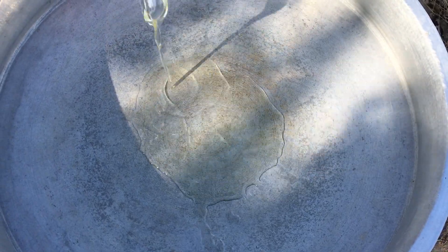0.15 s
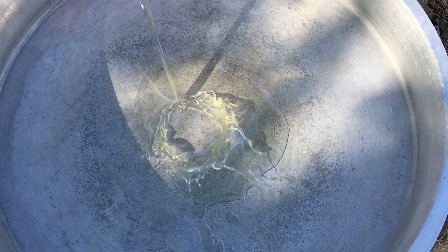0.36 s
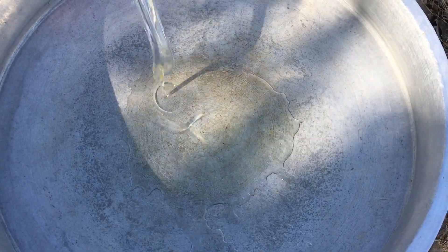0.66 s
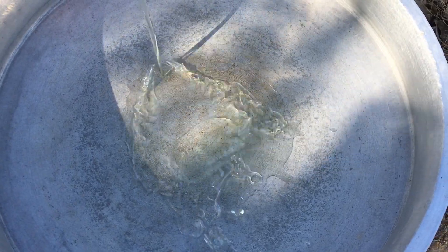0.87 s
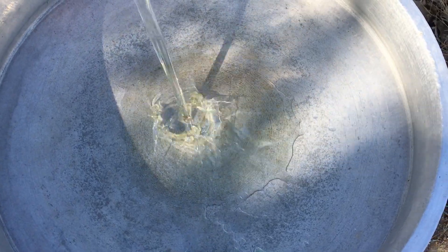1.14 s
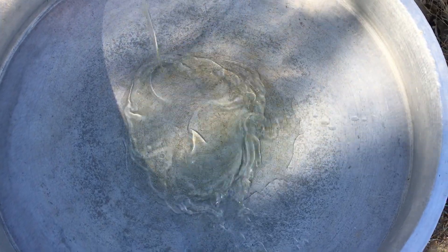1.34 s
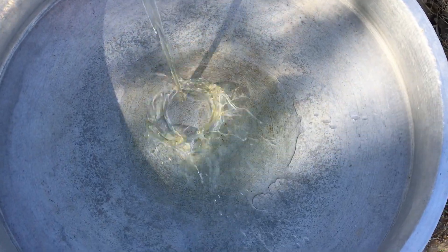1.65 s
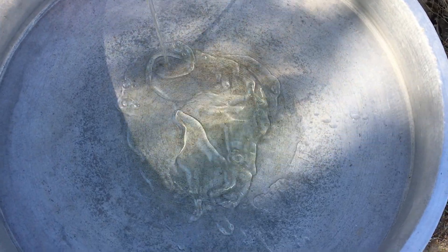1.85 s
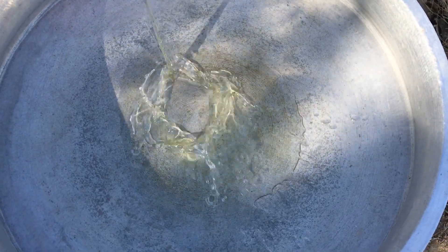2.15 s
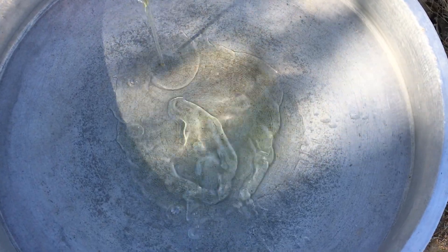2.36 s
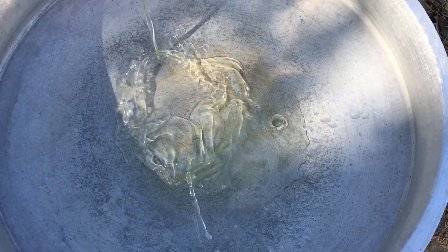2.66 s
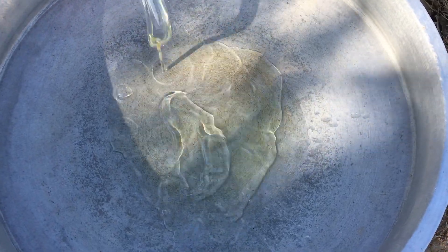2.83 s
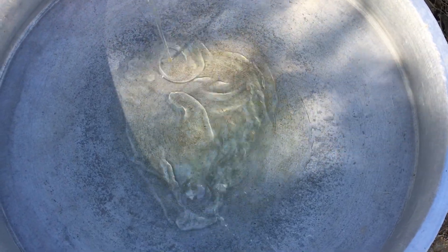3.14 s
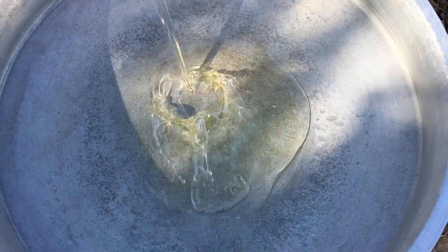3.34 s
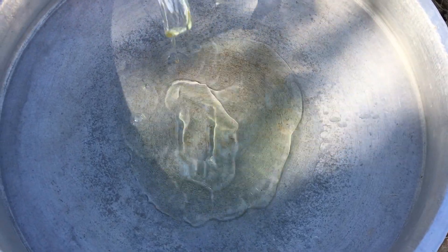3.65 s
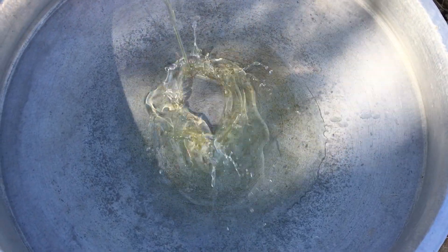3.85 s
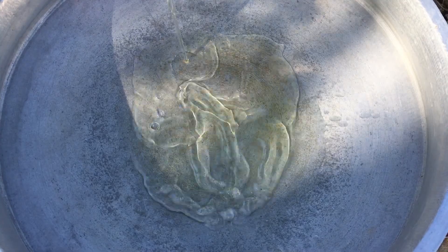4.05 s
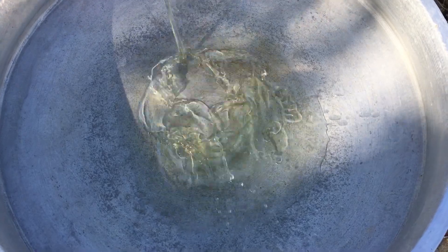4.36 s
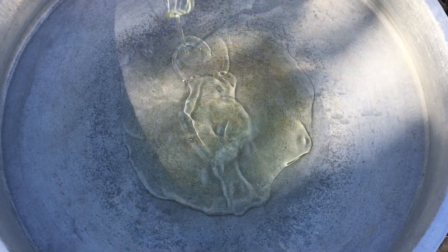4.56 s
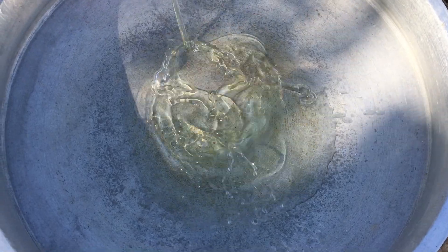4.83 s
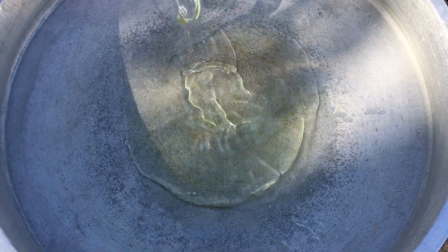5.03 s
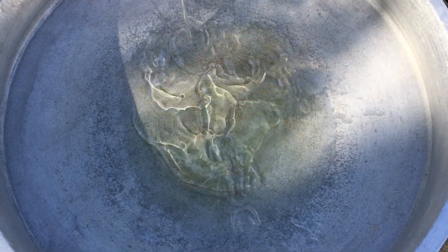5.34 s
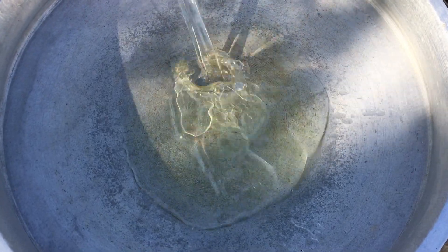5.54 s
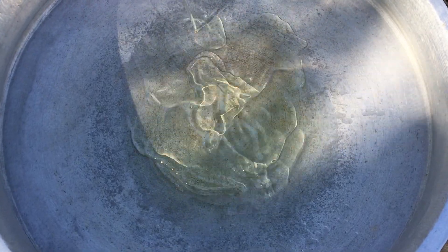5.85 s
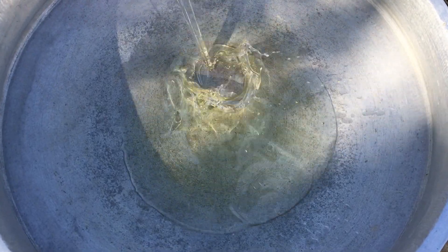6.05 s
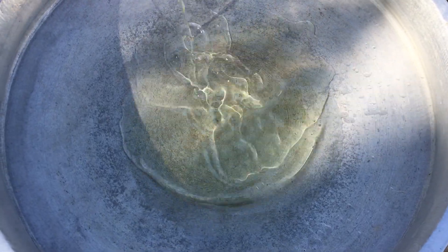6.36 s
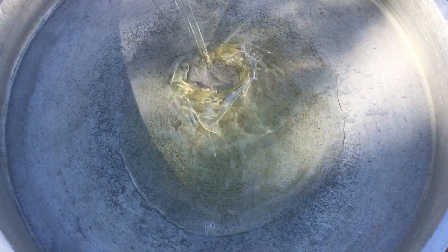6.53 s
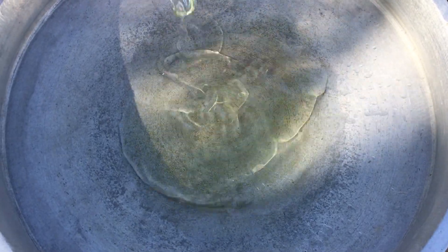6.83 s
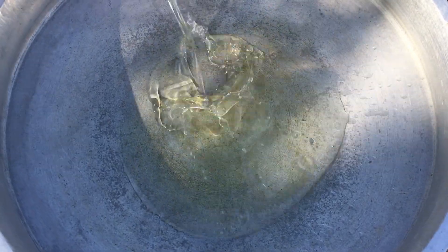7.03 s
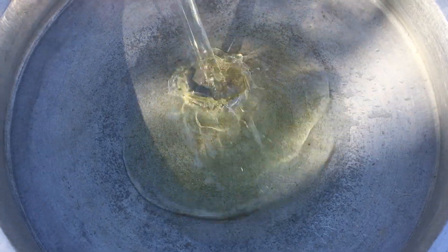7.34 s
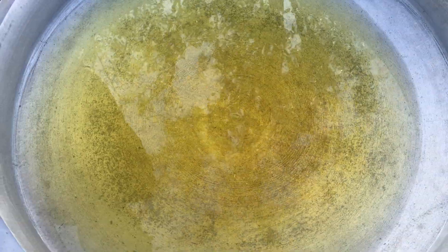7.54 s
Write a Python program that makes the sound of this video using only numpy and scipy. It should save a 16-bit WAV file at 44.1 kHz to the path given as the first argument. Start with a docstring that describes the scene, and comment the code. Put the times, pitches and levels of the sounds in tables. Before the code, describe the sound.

Outdoors, oil pours from a bottle into a wide metal pan, about two pulses a second. Each soft slap brings a rising plop, small bubble blips and a faint, short metallic ring; dull gulps from the bottle fall in between. Droplets tick sharply, most strongly just after six seconds. Low wind thumps the close microphone throughout, over faint hiss. Near the end everything cuts to silence briefly.

```python
"""Outdoors, cooking oil glugs out of a bottle in pulses and lands in a wide metal pan.
Trapped air bubbles are decaying sines, many gliding upward, that set the pan's resonances ringing.
Slugs slap down as noise bursts with rising plops, droplets tick and fizz, and the bottle gulps air.
Low noise makes the wind buffeting the microphone, over a faint hiss. Near the end the sound cuts out briefly."""
import sys
import numpy as np
from scipy import signal
from scipy.fft import rfft, irfft, next_fast_len
from scipy.io import wavfile
from scipy.ndimage import uniform_filter1d

SR = 44100
rng = np.random.default_rng(int(sys.argv[2]) if len(sys.argv) > 2 else 0)


def file_out(sig):
    """Save sig as 16-bit WAV at sys.argv[1]."""
    # one column per channel
    cols = np.atleast_2d(sig).T
    # limit, then scale
    lim = np.clip(cols, -1, 1)
    pcm = np.round(lim * 32767).astype(np.int16)
    wavfile.write(sys.argv[1], SR, pcm)


N = 339215  # length of the scene in samples


def undb(db):
    """Turn decibels into an amplitude factor."""
    return 10 ** (np.asarray(db) / 20)


def level(x, db):
    """Scale x so that its RMS (average strength) is db."""
    return x * undb(db) / np.sqrt(np.mean(x ** 2))


def band(x, lo_hz, hi_hz, order=2):
    """Keep only the pitches between two limits."""
    limits = [lo_hz, min(hi_hz, .45 * SR)]
    return signal.sosfilt(signal.butter(order, limits, "bandpass", fs=SR, output="sos"), x)


def add(out, s, x):
    """Mix x into out from time s on."""
    i = int(s * SR)
    out[i:i + len(x)] += x[:len(out) - i]


def wander(length, rate):
    """Random values, rate of them per second, joined by smooth slopes."""
    hold = int(SR / rate)
    steps = np.repeat(rng.standard_normal(length // hold + 1), hold)
    return uniform_filter1d(steps, hold)[:length]


def walk(rate):
    """A random wander as long as the scene."""
    return wander(N, rate)


def chirp(db, hz, t60, octaves, attack_s=0.00022, bend=1.01, burst=2.26, life=np.inf):
    """A sine that fades 60 dB in t60 while its pitch glides by the given octaves; bend delays the glide."""
    t = np.arange(int(max(t60, .005) * SR)) / SR
    pitch = np.minimum(hz * 2 ** (octaves * (t / t60) ** bend), .4 * SR)
    cycles = np.cumsum(pitch) / SR
    # a bubble bursts once its pitch has climbed by the factor burst or its life in cycles is used up
    bursting = (pitch / (burst * hz)) ** 6 + (cycles / life) ** 8
    alive = (1 - np.exp(-t / attack_s)) / (1 + bursting)
    return undb(db - 60 * t / t60) * alive * np.sin(2 * np.pi * cycles)


def rough(x, depth_db=3, rate=500):
    """The torn oil surface makes a tone flutter in level."""
    return x * undb(depth_db * wander(len(x), rate))


def splash(db, hz, t60, wide, attack_s=0.00084):
    """A decaying noise burst from hz / wide to hz * wide."""
    t = np.arange(int(max(t60, .005) * SR)) / SR
    noise = level(band(rng.standard_normal(len(t)), hz / wide, hz * wide), db)
    return noise * undb(-60 * t / t60) * (1 - np.exp(-t / attack_s))


def eddies(lo_hz, hi_hz, db):
    """Swirling air as band noise, its loudness evened out over a few cycles."""
    x = band(rng.standard_normal(N), lo_hz, hi_hz)
    power = uniform_filter1d(x ** 2, int(1.6 * SR / lo_hz))
    return level(x / np.sqrt(power + 1e-12), db)


# Colour of the outdoor hiss: f/Hz, relative level/dB (per Hz)
HISS_COLOUR = [(24, -50), (40, 11.5), (112, -11), (400, -13), (2380, -13.5), (4930, -17.5), (9450, -25.5),
               (14500, -40.5), (16000, -51.5)]
HISS_DB = -53  # RMS before the swelling


def air():
    """Distant outdoor hiss: noise coloured pitch by pitch, swelling a little."""
    hz, db = np.transpose(HISS_COLOUR)
    size = next_fast_len(N)
    bins_hz = np.maximum(np.arange(size // 2 + 1) * SR / size, 1)
    colour = undb(np.interp(np.log(bins_hz), np.log(hz), db))
    hiss = irfft(rfft(rng.standard_normal(size)) * colour, size)[:N]
    return level(hiss, HISS_DB) * undb(0.367 * walk(3.5))


# Slow strength of the wind on the microphone, before its flutter: t/s, level/dB
GUSTS = [(0, -36.5), (.7, -36.5), (.96, -56.5), (1.15, -35), (1.4, -54), (1.7, -42.5), (2.45, -36.5),
         (2.62, -48.5), (2.95, -54.5), (3.15, -35.5), (3.55, -47.5), (3.75, -37.5), (4.08, -48.5),
         (4.3, -34), (4.58, -47.5), (4.72, -29.5), (5.8, -47.5), (6.6, -36.5), (6.85, -45.5), (7.2, -27),
         (7.5, -38), (7.69, -57)]
# Single buffets that stand out of the wind: start t/s, time until the fade t/s, level/dB
BUFFETS = [(.004, 0.0473, -23.5), (0.092, 0.045, -26), (0.201, 0.034, -24.5), (0.344, 0.07, -32.5),
           (0.417, 0.087, -27), (1.078, 0.017, -30.5), (1.845, 0.043, -31.5), (2.279, 0.013, -28),
           (2.393, 0.019, -30), (3.24, 0.055, -35), (4.335, 0.027, -30), (4.685, 0.057, -27.5),
           (4.773, 0.18, -27.5), (5.054, 0.019, -25), (5.143, 0.065, -28.5), (5.249, 0.018, -26),
           (5.306, 0.063, -27.5), (5.467, 0.071, -28), (5.594, 0.097, -33), (5.692, 0.0586, -30),
           (5.796, 0.056, -31), (6.579, 0.046, -30), (6.641, 0.029, -30.5), (6.708, 0.055, -33),
           (7.103, 0.073, -30), (7.142, 0.015, -19), (7.186, 0.025, -25.5), (7.284, 0.11, -28),
           (7.423, 0.029, -31)]
BUFFET_ATTACK_S, BUFFET_RELEASE_S, FLUTTER_DB = 0.011, 0.0068, 2.5


def wind():
    """Low turbulence; harder gusts reach higher in pitch, in short thumps."""
    t = np.arange(N) / SR
    power = undb(np.interp(t, *np.transpose(GUSTS)) + FLUTTER_DB * walk(18)) ** 2
    for s, length, db in BUFFETS:
        shape = np.minimum((t - s) / BUFFET_ATTACK_S, (s + length - t) / BUFFET_RELEASE_S + 1)
        power = power + (undb(db) * np.clip(shape, 0, 1)) ** 2
    db = 10 * np.log10(power)
    force = db + 29.5  # dB above a firm wind
    thumps = np.clip(walk(45), -2, 1)
    low = eddies(43.3, 80.1, db=0.5)
    mid = eddies(85.2, 159.0, db=-10.0) * undb(0.96 * force + 4.9 * thumps)
    top = eddies(110, 410, db=-28.0) * undb(1.9 * force + 5 * thumps)
    # single eddies hit the microphone, about 30 a second and of random strength: round, heavy pulses
    hits = (rng.random(N) < 30 / SR) * rng.standard_normal(N)
    knocks = level(band(hits, 45, 158, order=1), -7.5) * undb(.5 * force)
    return band(undb(db) * (low + mid + top + knocks), 35.6, 289, order=3)


# How thickly fine spatter flies, as a gain: t/s, level/dB
SPATTER = [(0, -61), (1.9, -60.5), (2.15, -51), (2.55, -47), (2.95, -56.5), (5.7, -72), (5.9, -46),
           (6.1, -66)]


def spatter():
    """Many faint droplets merging into a soft fizz; the highest are weak and brief."""
    out = np.zeros(N)
    for when, height, strength in rng.random((3000, 3)):
        drop = splash(9 * strength ** 5 - 6 * height, 1500 * 2 ** (3.1 * height),
                      t60=.05 - .025 * height, wide=1.5, attack_s=0.0031)
        add(out, when * N / SR, drop)
    # some droplets trap a tiny bubble that blips; the stronger ones rise more
    for when, height, strength in rng.random((600, 3)):
        blip = chirp(15 * strength ** 3, 1200 * 2 ** (2.4 * height), t60=.018, octaves=2 * strength - .5)
        add(out, when * N / SR, rough(blip))
    return out * undb(np.interp(np.arange(N) / SR, *np.transpose(SPATTER)))


# Air bubbles in the oil: t/s, level/dB (before fading and flutter), start f/Hz,
# glide/octaves (per t60), drive to the pan level/dB (relative to the bubble)
BUBBLES = [(.0094, -32.5, 3280, 0.5, -3), (.498, -32.5, 3000, -0.5, -4), (0.648, -32.5, 1360, 7.5, -28),
           (.66, -21, 2058, 0.1, 2.5), (0.7213, -22, 1920, 1.1, 2), (1.056, -38.5, 2800, -1, 16.5),
           (1.467, -40, 2580, 0, 4), (1.529, -37, 2520, 0, 4), (1.792, -39, 3470, 1, 8),
           (2.0513, -40, 2280, -0.15, 9.5), (2.292, -38, 3450, -1, -2), (2.411, -47, 2350, -1, 6),
           (3.2125, -25.5, 1445, 1.5, -3), (3.5957, -54.5, 1960, 0.5, 20.5), (3.635, -50, 2400, -1, 19),
           (3.7515, -32, 2586, 0, -6), (4.144, -34, 2147, 1.4, 4.5), (4.498, -38, 2680, -1, 2),
           (4.515, -53.5, 1880, 1.3, 16.5), (4.607, -38, 2000, 1, 6.5), (4.889, -35, 2800, -0.94, 4.5),
           (4.931, -37, 1980, 9.5, 0), (5.0012, -29, 2200, 2.5, -1.5), (5.009, -36, 810, 5, 6.5),
           (5.5035, -37, 1510, 4, -4), (5.778, -30, 3070, 2, -18), (5.863, -38, 2223, 0, 15.5),
           (5.87, -38, 1130, -0.5, 5), (5.913, -37.5, 1226, 1, 0.5), (5.921, -32.5, 1870, 7.5, 2),
           (5.962, -30.5, 2143, 0.94, -3), (5.989, -42.5, 1402, 1.5, 9), (6.049, -47.5, 1970, 2.5, -4.5),
           (6.2842, -32.5, 1168, 6.5, -3), (6.353, -25, 1840, 0.26, 1.5), (6.386, -31.5, 3010, -0.8, 0),
           (6.491, -37, 1083, 2.5, 4), (6.8163, -33, 3180, 1, -3.5), (7.225, -27, 1474, 1.3, -4),
           (7.275, -35, 1224, 0.5, 5.5), (7.3868, -34, 3550, 0, 6)]
BUBBLE_CYCLES, RISING_CYCLES = 75, 60.1  # cycles (at start pitch) in a t60; extra per octave of glide
LIFE_CYCLES = 65  # a bubble at the surface bursts after about this many cycles


def bubbles():
    """Trapped air rings as a gliding tone with a splash; returns the direct sound and the push on the pan."""
    direct, drive = np.zeros(N), np.zeros(N)
    for s, db, hz, octaves, ring_db in BUBBLES:
        t60 = (BUBBLE_CYCLES + RISING_CYCLES * min(octaves, 1)) / hz
        tone = chirp(db, hz, t60, octaves, life=LIFE_CYCLES)
        add(direct, s, rough(tone, depth_db=4.5, rate=300))
        add(direct, s, splash(db - 9.0, hz * 1.01, t60=0.098, wide=1.35))
        add(drive, s, tone * undb(ring_db))
    return direct, drive


# Modes (ringing pitches) of the pan: f/Hz, relative level/dB
PAN_MODES = [(1104, 1), (1450, -6), (1570, -2), (1874, -1), (2050, -5.5), (2200, -9), (2410, -1), (2650, 0),
             (2770, -9.5), (2970, 4.5), (3240, 2.5), (3520, -5.5)]
PAN_T60_S = 0.35  # at 1 kHz; higher modes die sooner


def pan(drive):
    """The pan answers with the modes near the driving pitch: beating pairs, unevenly damped by sloshing oil."""
    out = 0
    for hz, db in PAN_MODES:
        slosh = undb(4.5 * walk(70))
        t60 = PAN_T60_S * (1000 / hz) ** 0.59
        for twin_hz, twin_db in ((hz, db), (hz + 60, db - 14)):
            # one decaying spin per sample makes a resonator
            pole = np.exp(2j * np.pi * twin_hz / SR - np.log(1000) / (t60 * SR))
            ring = signal.lfilter([1], [1, -pole], drive).imag
            out = out + slosh * undb(twin_db) * ring
    return out


# Droplets and bursting films: t/s, level/dB (each part sits below it), centre f/Hz
TICKS = [(0.069, -38.5, 5530), (0.153, -32.5, 3100), (0.242, -34, 3820), (0.329, -36.5, 2190),
         (0.4839, -31, 7390), (0.849, -24.5, 1380), (1.0914, -30, 3200), (1.328, -36.5, 9100),
         (1.342, -27.5, 2490), (1.345, -29.5, 5030), (1.547, -30, 4470), (2.136, -31, 3000),
         (2.266, -32, 2980), (2.3874, -29.5, 8500), (2.4465, -27, 3350), (2.466, -33, 9550),
         (2.492, -27, 3980), (2.6455, -30, 4400), (2.7438, -35, 7640), (2.919, -27.5, 2730),
         (3.261, -31.5, 4850), (3.265, -23, 2480), (3.322, -37, 3250), (3.5096, -27.5, 4750),
         (3.571, -34.5, 3550), (3.6552, -32, 7220), (3.9439, -36, 12200), (4, -39.5, 8000),
         (4.011, -29, 3650), (4.085, -34, 4500), (4.1898, -30.5, 6100), (4.4692, -31.5, 11550),
         (4.472, -34, 3370), (4.496, -37, 5270), (4.627, -36, 2730), (4.897, -32, 6640),
         (4.918, -31.5, 6530), (5.005, -29.5, 10970), (5.304, -24.5, 6120), (5.3717, -25.5, 3410),
         (5.416, -42, 13000), (5.453, -31, 2970), (5.468, -36, 6460), (5.4761, -28, 5250),
         (5.792, -27.5, 5340), (5.813, -35, 1700), (5.824, -31, 4970), (5.914, -23.5, 5980),
         (5.972, -27, 2300), (6.259, -12, 6020), (6.261, -18, 7840), (6.3615, -18.5, 4250),
         (6.452, -25, 1880), (6.696, -33, 8200), (6.871, -36, 6000), (6.9112, -32.5, 5100),
         (7.176, -27, 3050), (7.241, -26.5, 2560), (7.321, -32, 2670), (7.5155, -27.5, 8200)]


def ticks():
    """Droplets: a short snap, a wet ring around each centre, a tiny bubble and a few scattered blips."""
    out = np.zeros(N)
    for (s, db, hz), blips in zip(TICKS, rng.random((len(TICKS), 3, 3))):
        for late, pitch, glide in blips:
            blip = chirp(db - 12.5 - 10 * late, hz * 2 ** (pitch - .5), t60=0.022, octaves=glide - .5)
            add(out, s + .03 * late, rough(blip))
        add(out, s, splash(db - 6.5, hz, t60=0.014, wide=1.81, attack_s=0.00053))  # snap
        add(out, s, splash(db - 11, hz, t60=0.055, wide=1.15, attack_s=0.0017))  # wet ring
        add(out, s, rough(chirp(db - 7.5, hz, t60=0.013, octaves=0.45)))  # tiny bubble
    return out


# Slugs of oil landing: t/s, slap level/dB (parts are set around it), plop level/dB (before fading)
SLUGS = [(0.227, -44, -50), (1.087, -33, -41), (1.549, -35, -33.5), (2.008, -36.5, -34),
         (2.447, -37.5, -51), (2.857, -41.5, -55), (3.263, -40.5, -43), (3.707, -42, -45.5),
         (4.165, -39.5, -51), (4.626, -33.5, -41), (5.087, -41.5, -40), (5.526, -35, -36), (5.97, -39, -45),
         (6.447, -38, -39), (6.91, -39, -36), (7.467, -36.5, -57)]
PLOP_HZ, TAIL_DELAY_S, TAIL_DB = 881.4, 0.11, -5.5  # the thin tail of the slug lands a little later


def slugs():
    """Each slug slaps down and its hollow closes with a fast rising plop; returns direct sound and pan push."""
    direct, drive = np.zeros(N), np.zeros(N)
    for s, db, plop_db in SLUGS:
        # the glide starts late and then shoots up until the burst silences it
        plop = rough(chirp(plop_db, PLOP_HZ, t60=.14, octaves=270, attack_s=.003, bend=2.8, burst=4.5))
        add(direct, s, splash(db - 3.0, 410, t60=0.041, wide=3.2))
        add(direct, s, splash(db, 940, t60=0.058, wide=1.18, attack_s=0.0027))
        add(direct, s + TAIL_DELAY_S, splash(db + TAIL_DB, 830, t60=0.023, wide=1.2))
        add(direct, s, plop)
        add(direct, s, splash(db + 1.0, 2090, t60=0.056, wide=1.65, attack_s=0.0016))
        add(drive, s, plop * undb(-16.0))
    return direct, drive


# The bottle gulps air: t/s, level/dB (parts are set around it)
GULPS = [(0.402, -43), (1.257, -44.5), (1.723, -43.5), (2.184, -44.5), (2.615, -44.5), (3.033, -42.5),
         (3.43, -44.5), (3.877, -45.5), (4.34, -42.5), (4.792, -47), (5.246, -48.5), (5.686, -47.5),
         (6.122, -47), (6.6, -51), (7.069, -43)]
GULP_HZ = 528


def bottle():
    """Each gulp is a dull knock sliding down in pitch, with a brighter wet smack and a low splash."""
    out = np.zeros(N)
    for s, db in GULPS:
        add(out, s, rough(chirp(db + 2.5, GULP_HZ, t60=0.052, octaves=-0.27, attack_s=0.00014)))
        add(out, s, splash(db - 3, 900, t60=.05, wide=1.8))
        add(out, s, splash(db, 374, t60=0.13, wide=1.96))
    return out


def scene():
    """Mix every source; bubbles and plops are heard directly and through the pan."""
    bubble_sound, bubble_drive = bubbles()
    slug_sound, slug_drive = slugs()
    ringing = undb(-46.0) * pan(bubble_drive + slug_drive)
    oil = bubble_sound + slug_sound + ringing
    return (air() + wind() + spatter() + oil + ticks() + bottle())[None]


GAP_START_S, GAP_END_S = 7.523, 7.661
TOP_HZ = 16000


def record(dry):
    """A short gap of silence, then everything above TOP_HZ is cut steeply."""
    t = np.arange(N) / SR
    gap = (t > GAP_START_S) & (t < GAP_END_S)
    return signal.sosfilt(signal.ellip(10, .2, 80, TOP_HZ, fs=SR, output="sos"), dry * ~gap)


dry = scene()
out = record(dry)
file_out(out)
```